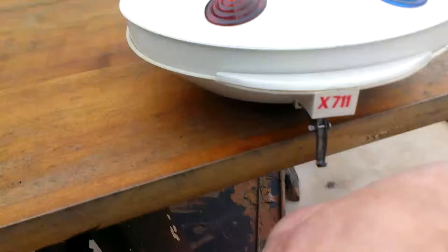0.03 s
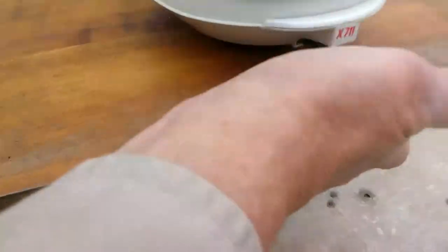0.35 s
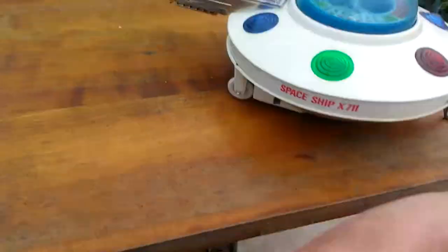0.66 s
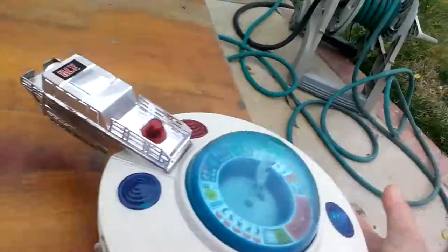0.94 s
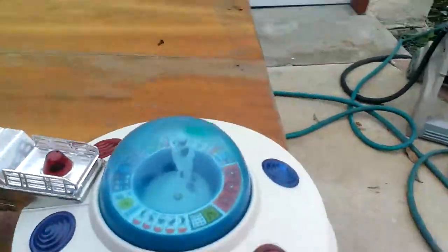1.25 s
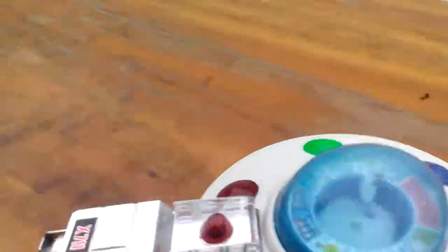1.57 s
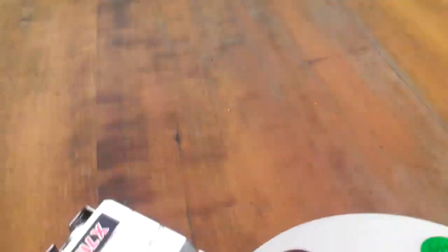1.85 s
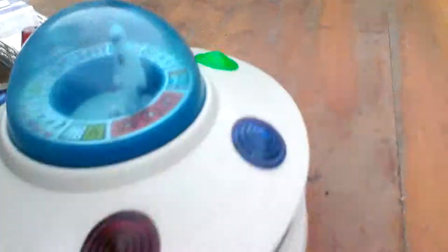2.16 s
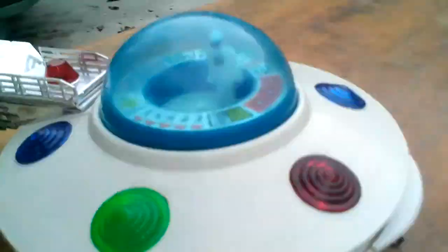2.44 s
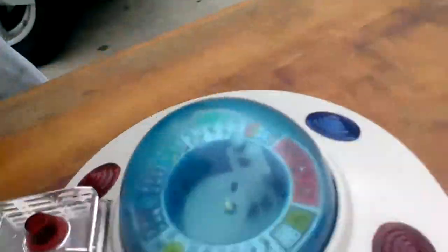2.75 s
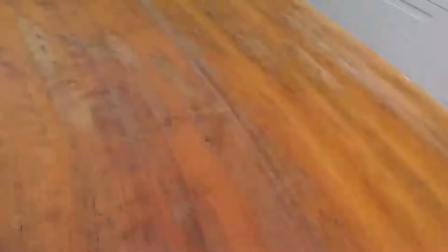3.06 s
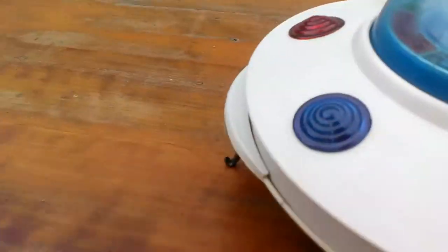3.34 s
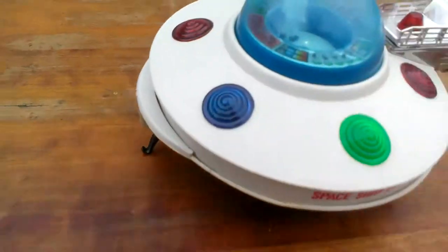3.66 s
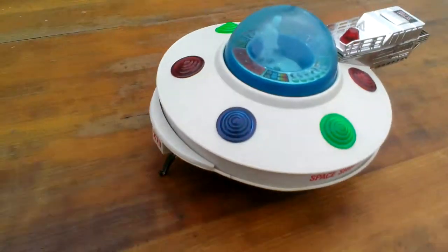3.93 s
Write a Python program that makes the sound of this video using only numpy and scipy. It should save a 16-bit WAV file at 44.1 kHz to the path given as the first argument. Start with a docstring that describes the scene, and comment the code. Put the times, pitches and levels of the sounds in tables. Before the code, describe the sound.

A battery toy flying saucer whirs steadily, its loose gears chattering and rasping in a hollow plastic shell. It rattles harder now and then, with faint wheel bumps on a wooden table, close to a moving microphone outdoors.

```python
"""Toy flying saucer on a wooden table

A battery toy drives about outdoors, close to a moving microphone. Its motor's loose gears chatter
and rasp, forcing the resonances of the hollow shell, which now and then rattles harder or ticks.
The wheels rumble and bump on the table top; the colour shifts as toy and microphone turn."""
import sys
import numpy as np
from scipy import signal
from scipy.fft import rfft, irfft, next_fast_len
from scipy.io import wavfile
from scipy.ndimage import uniform_filter1d, map_coordinates

SR = 44100
rng = np.random.default_rng(int(sys.argv[2]) if len(sys.argv) > 2 else 0)


def master(y):
    """Save y as 16-bit WAV."""
    cut = np.clip(np.atleast_2d(y).T, -1, 1)
    pcm = np.round(cut * 32767)  # scale
    wavfile.write(sys.argv[1], SR, pcm.astype(np.int16))


N = 176400


def gears():
    """Forced vibration: tooth impacts and friction drive the shell; bands swell and fade as it turns."""
    # envelopes of seven bands, before trim: time_s, level_db
    low_mids = [(0.12, -47), (0.49, -47), (0.55, -39), (0.72, -46.5), (1.45, -44), (1.52, -37.5),
                (1.6, -47), (1.82, -42), (2.29, -45), (2.36, -36), (2.44, -44), (2.48, -38), (2.59, -42.5),
                (2.69, -44.5), (2.71, -31.5), (2.72, -40.5), (3.4, -42), (4.0, -45.5)]
    mids = [(0.12, -39.5), (0.51, -43.5), (0.53, -40), (0.82, -43), (0.84, -40.5), (1.08, -41.5),
            (1.15, -39), (1.66, -36.5), (1.7, -39), (1.74, -34.5), (1.89, -39.5), (1.95, -36),
            (2.28, -41.5), (2.45, -42.5), (2.46, -34.5), (2.51, -37.5), (2.65, -36), (2.68, -38.5),
            (3.05, -32.5), (3.5, -37), (3.53, -31.5), (3.56, -36), (3.86, -37.5), (4.0, -40.5)]
    whir = [(0.12, -36), (0.23, -29), (0.24, -34), (0.62, -30.5), (0.84, -35), (0.89, -33), (0.9, -33.5),
            (1.75, -36.5), (1.77, -30), (1.78, -37), (2.13, -30.5), (2.29, -36), (2.44, -23.5), (2.54, -37),
            (2.56, -32), (2.89, -35), (3.0, -30), (3.03, -33), (3.12, -28.5), (3.17, -36), (3.67, -32),
            (3.7, -37), (3.76, -29.5), (4.0, -35)]
    upper_mids = [(0.12, -43), (0.16, -36), (0.23, -39.5), (0.63, -32.5), (0.68, -41), (0.77, -33.5),
                  (0.79, -40.5), (1.06, -42), (1.09, -33), (1.1, -41.5), (1.35, -40.5), (1.48, -35.5),
                  (2.1, -44), (2.31, -37), (2.32, -32.5), (2.51, -39), (2.7, -37), (2.87, -42.5),
                  (2.9, -38), (3.74, -39), (3.98, -43), (4.0, -48)]
    low_treble = [(0.12, -36), (0.23, -42), (0.95, -38), (0.96, -41), (1.22, -37), (1.26, -42),
                  (1.32, -34.5), (1.65, -40), (1.76, -34), (1.78, -39), (2.11, -42.5), (2.13, -40),
                  (2.48, -37), (2.49, -31), (2.52, -37.5), (3.32, -39), (3.55, -35.5), (3.62, -43),
                  (3.75, -37.5), (3.89, -40), (3.99, -36.5), (4.0, -38)]
    treble = [(0.12, -50), (0.21, -37), (0.25, -43), (0.64, -43.5), (0.71, -36.5), (0.91, -44),
              (1.19, -34.5), (1.23, -43), (1.33, -32.5), (1.66, -41), (1.88, -36), (2.12, -44.5),
              (2.15, -36.5), (2.3, -43), (2.49, -37), (2.51, -47), (2.54, -37.5), (2.92, -40), (3.1, -35),
              (3.21, -42.5), (3.73, -42), (3.77, -35.5), (3.83, -43), (4.0, -44)]
    fizz = [(0.12, -42.5), (0.65, -43.5), (1.19, -41), (1.31, -37.5), (1.95, -43), (2.12, -48.5),
            (2.25, -39), (2.29, -43), (2.49, -40), (2.5, -43), (2.89, -45.5), (2.91, -42), (2.94, -45),
            (3.09, -36), (3.18, -41), (3.2, -36.5), (3.44, -41), (3.58, -39.5), (3.6, -42.5), (3.73, -37.5),
            (3.86, -42.5), (4.0, -41)]
    # the bands, low to high: edge_hz; trim_db
    edges_hz = [250, 800, 1900, 2700, 4400, 6500, 8400, 15500]
    trims_db = [-0.39, -0.85, -0.97, -0.31, -0.14, 0.63, -0.39]
    contacts_per_s, spread_db, rub_db = 2200, 3, 1
    contacts = (rng.random(N) < contacts_per_s / SR) * amp(spread_db * rng.standard_normal(N))
    contacts *= rng.choice([-1, 1], N)
    rubbing = amp(rub_db) * rng.standard_normal(N)
    judder = amp(0.86 * wobble(knots_per_s=98))  # the gear train runs unevenly
    drive = (unit(contacts) + rubbing) * judder
    chatter = wandering_colour(signal.fftconvolve(drive, impulse_response(shell_gain))[:N])
    highpass = lambda hz, edge: 1 - 1 / (1 + (hz / edge) ** 24)
    envelopes = [low_mids, mids, whir, upper_mids, low_treble, treble, fizz]
    out = np.zeros(N)
    for envelope, trim_db, low, high in zip(envelopes, trims_db, edges_hz, edges_hz[1:-1] + [SR / 2]):
        band = filtered(chatter, lambda hz: highpass(hz, low) - highpass(hz, high))
        out += amp(curve(envelope) + trim_db) * levelled(band)
    return out


def shell_gain(hz):
    """Modal resonance: the hollow shell's modes add in power over a broad rasp."""
    # shell modes: centre_hz, width_hz, gain_db
    modes = [(483, 220, -18.5), (1268, 99, -9.5), (1610, 200, -11), (2145, 390, -3), (2403, 122, -1.5),
             (2950, 210, -10), (3703, 220, -9.5), (4874, 200, -12), (5840, 730, -15), (7030, 250, -14),
             (7870, 480, -13.5), (11460, 490, -20.5), (12640, 230, -19.5), (13800, 400, -24)]
    # floor under the modes: frequency_hz, gain_db
    rasp = [(120, -32), (260, -25), (380, -17), (900, -15), (2600, -9.5), (3300, -18), (4300, -16.5),
            (8000, -17), (10200, -19), (12500, -24.5), (15600, -29.5)]
    power = sum(amp(db) ** 2 / (1 + 2 * ((hz - centre) / width) ** 2) ** 2 for centre, width, db in modes)
    return np.sqrt(power + amp(along(rasp, hz)) ** 2)


def wandering_colour(x):
    """Directivity: spectral peaks, hollows and random patches drift as toy and microphone turn."""
    # moving peaks and hollows: time_s, centre_hz, gain_db
    hum_peak = [(.12, 474, 6), (.6, 500, 4.5), (.85, 530, 8.5), (1.0, 434, -1), (1.16, 380, 15.5),
                (1.4, 426, 5), (1.52, 380, 6.5), (1.85, 540, 6.5), (2.25, 520, 3.5), (2.37, 340, 6),
                (2.55, 426, 0), (2.71, 540, 8.5), (3.1, 450, -0.5), (4.0, 490, 3)]
    mid_peak = [(.12, 1390, 6.1), (.4, 1290, 1), (1.0, 1310, 3), (1.4, 1240, 5.2), (1.65, 1130, 2.7),
                (1.9, 1200, 4), (2.25, 1240, 2.9), (2.5, 1230, 1.4), (2.85, 1160, 9.5), (3.0, 1040, 9.4),
                (3.13, 1650, 4), (3.5, 1550, 1), (4.0, 1350, 1.1)]
    mid_hollow = [(.12, 1680, -7), (.7, 1620, -5), (1.15, 1470, -3), (1.45, 1420, -7.5), (1.75, 1410, -2.5),
                  (2.15, 1620, -11), (2.4, 1700, -3), (3.0, 1520, 0.5), (3.6, 1900, -5), (4.0, 1650, -0.5)]
    high_hollow = [(.12, 4840, -7), (.5, 4730, 1), (.8, 4450, -6.5), (.95, 4180, -6), (1.1, 4400, 7),
                   (1.36, 3850, -2), (1.55, 4000, -7.5), (2.1, 4030, -1), (2.35, 4250, -1),
                   (2.85, 4130, -1), (3.25, 4060, -7), (3.38, 4720, -14), (3.8, 4580, -6), (4.0, 4680, -3)]
    rasp_peak = [(.12, 5860, 4), (.55, 5150, -1), (.8, 5850, 7), (.98, 5230, 5), (1.2, 5850, 2),
                 (1.33, 4870, 3), (1.7, 5650, 3), (2.02, 5550, 2), (2.3, 4940, 2), (2.5, 4970, 4),
                 (2.66, 5800, 6), (2.87, 5060, 9), (2.96, 5100, 9), (3.15, 5370, -1), (3.4, 6000, 2),
                 (3.7, 5660, 3), (4.0, 5700, 15)]
    # moving peaks of constant gain: time_s, centre_hz
    whir_peak = [(0.12, 2080), (0.62, 2420), (0.85, 2280), (0.95, 2560), (1.22, 2200), (1.24, 2120),
                 (1.58, 2270), (1.63, 2150), (1.76, 2410), (2.0, 2310), (2.08, 2450), (2.95, 2300),
                 (3.05, 2060), (3.33, 2390), (3.71, 2190), (4.0, 2200)]
    hiss_peak = [(0.12, 7380), (0.17, 7500), (1.09, 7400), (1.17, 6970), (1.26, 7600), (1.33, 7300),
                 (1.5, 7630), (1.57, 7100), (1.72, 7750), (1.96, 7350), (1.99, 6900), (2.14, 7800),
                 (2.51, 7400), (2.55, 7080), (2.68, 7550), (2.75, 7130), (3.24, 7800), (3.56, 7260),
                 (3.63, 7640), (4.0, 7600)]
    # Gaussian spread of each track above: width_hz
    widths_hz = [51, 90, 138, 171, 180, 100, 172]
    # random patches of gain: frequency_hz, depth_db
    patch_depth = [(300, 1.45), (2300, 1.57), (4000, 2.5), (8000, 3), (11000, 3), (15000, 5)]
    patch_hz, patch_s, whir_db, hiss_db = 71.5, 0.019, 6.5, 8.5
    hz, t, spectra = signal.stft(x, SR, nperseg=1024)
    bell = lambda axis, centre, span: np.exp(-.5 * ((axis[:, None] - centre) / span) ** 2)
    patches = bell(hz, hz, patch_hz) @ rng.standard_normal(spectra.shape) @ bell(t, t, patch_s)
    colour_db = along(patch_depth, hz)[:, None] * unit(patches)
    tracks = [hum_peak, mid_peak, mid_hollow, high_hollow, rasp_peak]
    for peak, db in [(whir_peak, whir_db), (hiss_peak, hiss_db)]:
        tracks.append([(s, centre, db) for s, centre in peak])
    for track, width in zip(tracks, widths_hz):
        s, centre, db = np.transpose(track)
        colour_db += np.interp(t, s, db) * bell(hz, np.interp(t, s, centre), width)
    return signal.istft(spectra * amp(colour_db), SR, nperseg=1024)[1][:N]


def rattles():
    """Impact excitation: loose parts strike the shell, giving a rough burst and a brief damped ring."""
    # knocks on the shell: start_s, relative_db
    knocks = [(0.2222, -26), (0.4102, -21), (0.8498, -20.5), (0.8822, -15.5), (0.9916, -20.5),
              (1.7597, -19), (1.836, -19), (1.9762, -18.5), (2.2499, -20.5), (2.3623, -17.5), (2.3838, -18),
              (2.4096, -18), (2.4361, -16), (2.4599, -14.5), (2.4845, -15), (2.6516, -19), (2.935, -19.5),
              (2.9874, -12), (3.0656, -18.5), (3.1186, -14.5), (3.5057, -20), (3.7542, -15)]
    ring_hz, ring_rise_s, lowpass_hz = 2342, 0.0015, 4000
    response = impulse_response(lambda hz: shell_gain(hz) / np.sqrt(1 + (hz / lowpass_hz) ** 2))
    out = np.zeros(N)
    for start_s, db in knocks:
        t = np.maximum(np.arange(N) / SR - start_s, 0)
        pitch_hz = ring_hz * (1 + 0.022 * rng.standard_normal())
        envelope = t / ring_rise_s * np.exp(1 - t / ring_rise_s)
        out += amp(db - 4) * envelope * np.sin(2 * np.pi * pitch_hz * t)
        out += impact(start_s, db - 5.5, response, rise_s=0.001, t60_s=0.029)
    return out


def ticks():
    """Short contact, wide spectrum: hard plastic gives bright, dry ticks."""
    # plastic contacts: start_s, peak_db, centre_hz
    contacts = [(1.362, -24, 6500), (2.912, -19, 11500)]
    width_hz = 3200
    bright = lambda centre: impulse_response(lambda hz: 1 / (1 + ((hz - centre) / width_hz) ** 2))
    return sum(impact(s, db, bright(centre), rise_s=0.0001, t60_s=0.0074) for s, db, centre in contacts)


def wheels():
    """Structure-borne sound: the table top radiates the rolling and bumping of the wheels."""
    # response of the table top: frequency_hz, gain_db
    table_top = [(20, -13), (30, -24), (45, -25), (58, -22), (75, -5.5), (90, 1), (130, -2), (200, -3.5),
                 (260, -5.5), (400, -12), (900, -64)]
    # rolling envelope: time_s, relative_db
    rumble = [(0.12, -55.5), (0.44, -63.5), (0.63, -50), (0.67, -56), (2.28, -53.5), (2.29, -51),
              (2.6, -54.5), (3.04, -54), (3.13, -50), (3.2, -49.5), (3.93, -51.5), (4.0, -53)]
    # wheel bumps: start_s, relative_db, centre_hz
    bumps = [(0.248, -43, 124), (0.558, -44, 258), (0.629, -49, 137), (0.875, -38, 143), (1.14, -45, 237),
             (1.529, -39, 191), (1.918, -52, 99.6), (1.991, -48, 116), (2.29, -36, 258),
             (2.473, -38.5, 240), (2.74, -42, 113), (3.085, -33, 131), (3.127, -35, 96.9),
             (3.353, -44, 129), (3.609, -42, 86.1), (3.753, -33.5, 137)]
    bump_width_hz = 74
    wood = lambda hz: amp(along(table_top, hz))
    rolling = filtered(rng.standard_normal(N), wood) * amp(1.8 * wobble(knots_per_s=22.42))
    out = unit(rolling) * amp(curve(rumble) - 1.5)
    for start_s, db, centre in bumps:
        thud = impulse_response(lambda hz: wood(hz) / np.sqrt(1 + ((hz - centre) / bump_width_hz) ** 2))
        out += impact(start_s, db - 3, thud, rise_s=0.008, t60_s=0.12)
    return out


def impact(start_s, peak_db, response, rise_s, t60_s):
    """Convolution: a decaying burst of contact noise excites a body's impulse response."""
    t = np.arange(SR // 4) / SR
    burst = rng.standard_normal(len(t)) * (1 - np.exp(-t / rise_s)) * amp(-60 * t / t60_s)
    ring = signal.fftconvolve(burst, response)
    return np.pad(amp(peak_db) * ring / np.abs(ring).max(), (round(start_s * SR), N))[:N]


def impulse_response(gain, size=4096):
    """Minimum phase: folding the cepstrum gives a causal response with this gain."""
    cepstrum = irfft(np.log(gain(np.fft.rfftfreq(size, 1 / SR)) + 1e-6))
    cepstrum[1:size // 2] *= 2
    cepstrum[size // 2 + 1:] = 0
    return irfft(np.exp(rfft(cepstrum)))


def filtered(x, gain):
    """Zero-phase filtering by gain(hz)."""
    size = next_fast_len(N + SR // 2)
    return irfft(rfft(x, size) * gain(np.fft.rfftfreq(size, 1 / SR)), size)[..., :N]


def amp(db):
    """Decibels to amplitude ratio."""
    return 10 ** (np.asarray(db) / 20)


def unit(x):
    """Normalisation to rms 1."""
    return x / np.sqrt(np.mean(x ** 2) + 1e-20)


def levelled(x):
    """Normalisation by the running rms over 75 ms."""
    return x / np.sqrt(np.abs(uniform_filter1d(x ** 2, 3300)) + 1e-20)


def along(rows, hz):
    """Interpolation of (frequency_hz, value) rows on a log axis."""
    knots_hz, values = np.transpose(rows)
    return np.interp(np.log(hz + 1), np.log(knots_hz + 1), values)


def curve(rows):
    """Interpolation of (time_s, value) rows at every sample."""
    return np.interp(np.arange(N) / SR, *np.transpose(rows))


def wobble(knots_per_s):
    """Smooth modulation: a spline through random knots."""
    return map_coordinates(rng.standard_normal(4096), [np.arange(N) * knots_per_s / SR], mode="wrap")


def scene():
    """Mid-side stereo: a faint decorrelated copy sits in the side channel, mostly in the treble."""
    # side signal relative to mid: frequency_hz, gain_db
    width = [(100, -60), (1400, -50), (2800, -68), (3800, -24), (6000, -54.5), (8000, -50), (10500, -21),
             (14000, -18)]
    mid = gears() + rattles() + ticks() + wheels()
    noise = rng.standard_normal(SR // 50)
    decorrelated = signal.fftconvolve(mid, noise / np.linalg.norm(noise))[:N]
    side = filtered(decorrelated, lambda hz: amp(along(width, hz)))
    return np.array([mid + side, mid - side])


def record(dry):
    """Gating and band limiting: the sound sets in after a brief silence, its highest treble cut off."""
    start_s, fade_s, top_hz = 0.1, 0.011, 15750
    fade_in = np.clip((np.arange(N) / SR - start_s) / fade_s, 0, 1)
    return filtered(dry * fade_in, lambda hz: hz < top_hz)


dry = scene()
out = record(dry)
master(out)
```